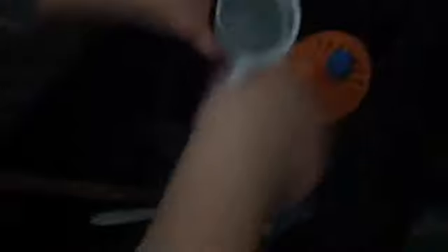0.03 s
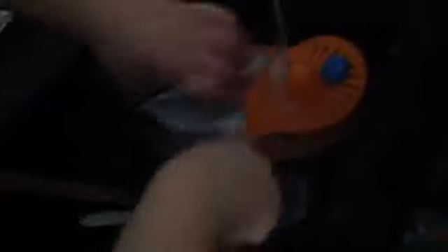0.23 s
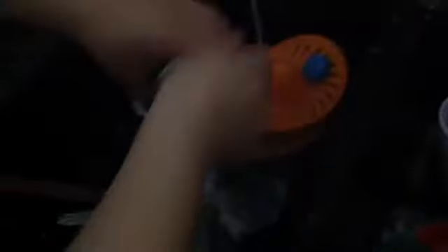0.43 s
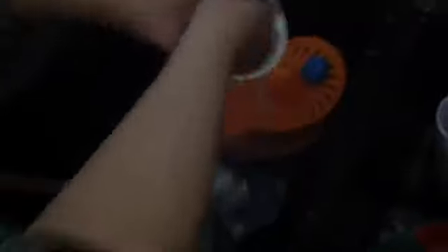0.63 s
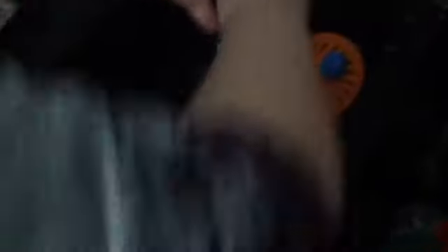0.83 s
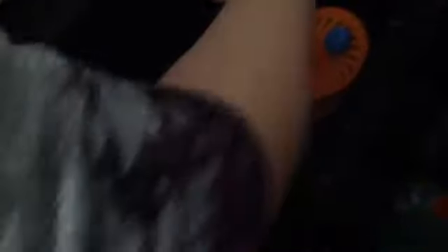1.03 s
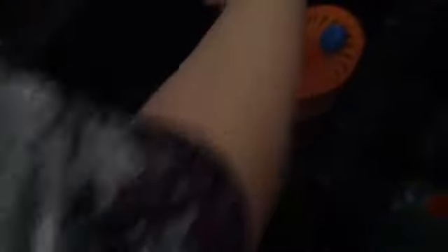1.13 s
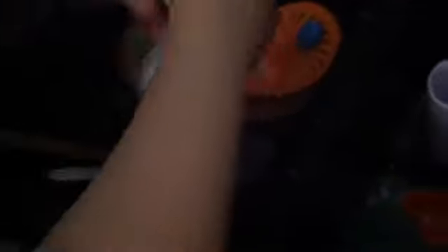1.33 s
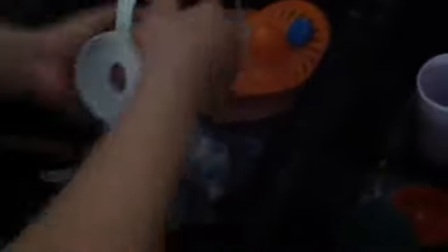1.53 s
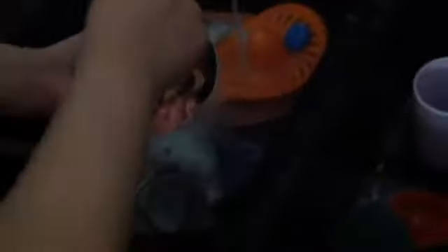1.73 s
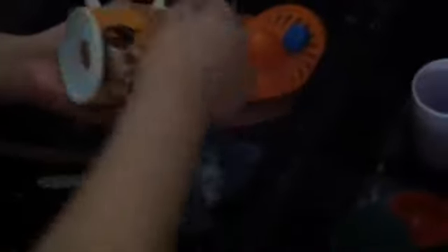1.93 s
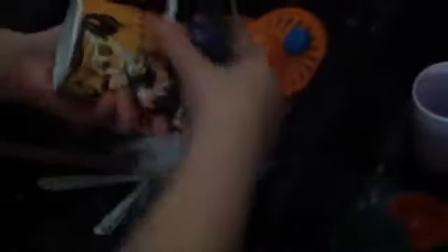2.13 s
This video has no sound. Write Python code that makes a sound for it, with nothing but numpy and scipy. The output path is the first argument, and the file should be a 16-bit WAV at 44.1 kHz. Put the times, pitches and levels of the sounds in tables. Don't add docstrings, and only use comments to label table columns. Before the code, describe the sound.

Crockery clatters sharply in a kitchen sink under a thin tap trickle, then a dull bang echoes.

```python
import sys
import numpy as np
from scipy import signal
from scipy.io import wavfile
from scipy.ndimage import uniform_filter1d

SR = 44100
rng = np.random.default_rng(int(sys.argv[2]) if len(sys.argv) > 2 else 0)


def makeup_ratio(level_db):
    decades = np.asarray(level_db, float) / 20
    return 10 ** decades


def to_wav(s):
    ch = np.atleast_2d(s).T
    pcm = np.round(np.clip(ch, -1, 1) * 32767)
    wavfile.write(sys.argv[1], SR, pcm.astype(np.int16))


N = 97020


def read(points, hz):
    f, value = np.transpose(points)
    return np.interp(np.log(hz + 1), np.log(f + 1), value)


def evened(x):
    return x / np.sqrt(np.mean(x ** 2) + 1e-20)


def add(mix, s, sound):
    part = mix[round(s * SR):][:len(sound)]
    part += sound[:len(part)]


def colour(x, gain_of_hz):
    hz = abs(np.fft.fftfreq(4096, 1 / SR))
    log_gain = np.log(np.maximum(gain_of_hz(hz), 1e-5))
    response = np.fft.ifft(np.exp(np.conj(signal.hilbert(log_gain)))).real[:2048]
    return signal.oaconvolve(x, response)[:len(x)]


def band(hz, centre_hz, octaves):
    return np.exp(-(np.log2((hz + 1) / centre_hz) / octaves) ** 2)


def humps(table, hz):
    return sum(makeup_ratio(2 * db) / (1 + (2 * (hz - f) / w) ** 2) for f, w, db in table)


def tail(decay, seconds):
    gap = 12
    taps = np.zeros(int(seconds * SR) // gap * gap)
    at = np.arange(0, len(taps), gap)
    taps[at + rng.integers(0, gap, len(at))] = rng.choice([-1., 1.], len(at))
    hz, t, z = signal.stft(taps, SR, nperseg=256)
    fade = makeup_ratio(-60 * t / read(decay, hz)[:, None])
    out = signal.istft(z * fade, SR, nperseg=256)[1]
    return out / np.linalg.norm(out)


def struck(modes, focus_hz, contact_s):
    t = np.arange(8000) / SR
    luck = rng.standard_normal((len(modes), 2))
    ring = np.zeros(len(t))
    for (f, db, t60), (a, b) in zip(modes, luck):
        focus_db = 9.5 * np.exp(-(np.log2(f / focus_hz) / 0.15) ** 2)
        pitch = f * (1 + 0.0099 * b)
        ring += makeup_ratio(db + 2.0 * a + focus_db - 60 * t / t60) * np.sin(2 * np.pi * pitch * t)
    ring *= 1 - np.exp(-t / max(contact_s / 3, 1e-4))
    return ring / abs(ring).max()


# f/Hz, level/dB
WATER_TONE = [(24, -60), (40, -25), (266, -4), (407, -9), (1160, -5), (1450, -6.5), (3840, -9.5),
              (14000, -9), (15500, -18.5)]
# f/Hz, width/Hz, level over the wash/dB
HOLLOWS = [(276, 164, 4), (638, 104, 7.5), (985, 47, 6.5), (1459, 106, 10.5), (6530, 140, 1),
           (8250, 94, 9.5), (10600, 86, 9.5), (14350, 240, 10.5)]
# t/s, level/dB
FLOW = [
    [(0.0, -41.5), (0.2, -44.5), (.7, -41)],
    [(1.2, -44), (1.35, -42.5), (1.5, -41.5), (1.67, -42.5), (1.8, -40), (1.92, -42.5), (2.05, -42.5),
     (2.2, -43.5)],
]


def water():
    grains_per_s, spatter_db, water_db = 1500, -8, -42
    grains = makeup_ratio(3 * np.minimum(rng.exponential(1, N), 5)) * (rng.random(N) < grains_per_s / SR)
    spatter = signal.oaconvolve(grains, np.exp(-np.arange(300) / 32.0))[:N] * rng.standard_normal(N)
    wash = rng.standard_normal(N)
    hz, t, z = signal.stft(wash + makeup_ratio(spatter_db) * evened(spatter), SR, nperseg=512)
    patches = uniform_filter1d(rng.standard_normal(z.shape), size=5, axis=0)
    patches = evened(uniform_filter1d(patches, size=8, axis=1))
    s, flow_db = np.transpose(FLOW[0] + FLOW[1])
    flow = np.interp(t, s, flow_db) - flow_db[-3:].mean()
    flow = flow * np.interp(hz, [1500, 4000], [0.5, 1])[:, None]
    x = signal.istft(z * makeup_ratio(1.3 * patches + flow), SR, nperseg=512)[1][:N]
    x = colour(x, lambda f: makeup_ratio(read(WATER_TONE, f)) * np.sqrt(1 + humps(HOLLOWS, f)))
    return makeup_ratio(water_db) * x / np.std(x[N // 2:])


# f/Hz, time to fade by 60 dB/s
KITCHEN = [(150, 1), (500, 0.95), (1500, 1), (4000, 0.68), (15000, 0.51)]


def earlier():
    out = np.zeros(N)
    rumble = colour(tail(KITCHEN, 1.0),
                    lambda f: (f / 200) ** 2 / (1 + (f / 200) ** 2) / (1 + (f / 625) ** 2))
    add(out, 0, makeup_ratio(-42) * rumble / np.std(rumble[:2000]))
    return out


# t/s, peak level/dB, f/Hz, time to
# fade by 60 dB/s
CLINKS = [(.03, -38, 257, 0.51), (0, -46, 3070, 0.53), (0.2243, -18.5, 8700, 0.037),
          (.2590, -14, 14600, 0.035), (.2610, -20.5, 10030, .03), (.2960, -20, 10940, 0.037),
          (.3192, -23, 8330, 0.02), (.3220, -16, 14600, .02), (.4035, -16, 10430, 0.029),
          (0.411, -27, 9400, 0.024), (.4255, -20, 13500, 0.033), (.4250, -22, 9000, 0.019),
          (.6150, -36, 671.7, 0.94), (.6780, -35, 682, 0.25)]


def clinks():
    out = np.zeros(N)
    for s, db, hz, t60 in CLINKS:
        modes = [(hz * k, 0, t60) for k in (.96, 1, 1.03)]
        add(out, s, makeup_ratio(db) * struck(modes, hz, 0.0012))
    return out


# t/s, peak level/dB, centre f/Hz, width/octaves
TICKS = [(0.2, -36.5, 6000, .1), (0.46, -24, 13700, .05), (.517, -20, 13200, .15),
         (0.623, -5.5, 13300, 0.27), (0.6231, -12, 8000, 0.45), (1.235, -25.5, 9450, 0.23),
         (1.244, -23.5, 7400, 0.53), (1.2918, -23, 12000, 0.17), (1.2917, -29, 4500, 0.28),
         (1.3, -23, 4700, 0.8), (1.5032, -18, 12000, 0.55), (1.505, -38, 2900, 0.38),
         (1.679, -35, 11000, 0.2), (1.799, -29, 13000, .35), (1.795, -33.5, 9000, .25),
         (1.407, -35, 9800, .2), (1.436, -35, 12000, .25), (0.73, -31, 9800, .6),
         (1.889, -27.5, 9550, 0.17)]


def ticks():
    out, t = np.zeros(N), np.arange(2500) / SR
    for s, db, hz, octaves in TICKS:
        fade = makeup_ratio(-60 * t / .0045) + makeup_ratio(-16 - 60 * t / .04)
        burst = 6.5 * (t == 0) + rng.standard_normal(len(t)) * fade
        tick = colour(burst, lambda f: band(f, hz, octaves) + 0.012)
        add(out, s, makeup_ratio(db) * tick / abs(tick).max())
    return out


# t/s, peak level/dB, brightest ring f/Hz, crack level/dB, thud level/dB
KNOCKS = [(.2227, -13, 3350, 0, -16), (0.2300, -21.5, 6130, -3, -3), (0.2593, -8, 6130, -6.5, -17.5),
          (0.266, -7.5, 6212, -11.5, -14), (0.285, -15, 3100, -11, -18), (0.2978, -10, 3800, -6.5, -18.5),
          (0.32, -8, 3800, -11, -15), (0.3403, -20.5, 3020, -16, -7), (0.3577, -19, 6130, -12, -1.5),
          (0.3824, -12.5, 3200, -12.5, -15), (.4030, -11.5, 2275, -10, -8),
          (0.4117, -15.5, 2275, -4.5, -26), (0.4251, -14, 3010, -8.5, -7), (0.4484, -18.5, 5000, -6, -16),
          (0.472, -23, 3070, -25, -7)]
# f/Hz, level/dB, time to fade by 60 dB/s
MUG = [(1196, -7.5, 0.035), (2275, -11.5, 0.035), (3010, -3.5, 0.036), (3020, -10.5, 0.033),
       (3200, -1.5, 0.057), (3326, 2.5, 0.02), (3800, -14, 0.024), (3950, -10.5, 0.12), (5000, -17, 0.079),
       (6130, -5, 0.027), (6212, -8, 0.053), (7000, -23, 0.028), (8520, -6.5, 0.032), (10900, -5, 0.036)]
# f/Hz, level/dB
CRACK = [(180, -37), (300, -13), (1620, -5), (3130, -4.5), (4570, -9), (6050, -8.5), (15500, -12.5)]


def knocks():
    rings, noises, t = np.zeros(N), np.zeros(N), np.arange(8000) / SR
    contact_s, thud_hz, thud_t60 = 0.0041, 263, 0.18
    ring_db, thud_all_db = -5, -10
    grip = 0.57 + (1 - 0.57) * np.exp(-(t / 0.0058) ** 2)
    for s, db, hz, crack_db, thud_db in KNOCKS:
        a, b = rng.standard_normal((2, len(t)))
        spots = np.c_[np.arange(13) * 1000 + 3000, np.r_[0, 4.0 * rng.standard_normal(12)]]
        crack = evened(colour(a, lambda f: makeup_ratio(read(CRACK, f) + read(spots, f))))
        crack *= np.exp(-t / (1.94 * contact_s)) * np.minimum(t / 0.00082, 1)
        thud = evened(colour(b, lambda f: 1 / (1 + ((f - thud_hz) / 80) ** 2)))
        thud *= np.minimum(t / 0.016, 1) * makeup_ratio(-60 * t / thud_t60)
        add(rings, s, makeup_ratio(db + ring_db) * struck(MUG, hz, contact_s) * grip)
        add(noises, s, makeup_ratio(db + crack_db) * crack + makeup_ratio(db + thud_db + thud_all_db) * thud)
    return rings, noises


# t/s, peak level/dB, f/Hz, partner f/Hz, held/s
PINGS = [(.2230, -1.5, 3190, 3083, .004), (.2229, -16.5, 1154, 950, 0.0038),
         (.2230, -19.5, 6190, 6050, 0.012), (0.2231, -17, 3940, 5240, .005),
         (.2260, -23.5, 2262, 2204, .014), (.2294, -8.5, 3163, 3050, 0.0053),
         (.2362, -18, 3070, 3170, 0.0031), (.2612, -13.5, 6070, 6270, 0.0032),
         (.2668, -14.5, 6235, 3120, 0.0074), (0.2831, -16, 3080, 3200, .003),
         (.2980, -13, 3730, 3430, .002), (0.319, -15, 8360, 8250, 0.0059), (0.38, -27, 3160, 3180, 0.0089),
         (0.406, -16, 2993, 2275, 0.0044), (0.406, -22, 10600, 10350, 0.0033),
         (0.4253, -24, 2886, 3210, 0.0066)]


def pings():
    out = np.zeros(N)
    rise_s, stop_s, partner = 0.00062, 0.00094, 0.56
    for s, db, hz, partner_hz, held in PINGS:
        t = np.arange(0, held + 8 * stop_s, 1 / SR)
        shape = (1 - np.exp(-t / rise_s)) * np.exp(-np.maximum(t - held, 0) / stop_s)
        tones = np.sin(2 * np.pi * hz * t) + partner * np.sin(2 * np.pi * partner_hz * t)
        add(out, s, makeup_ratio(db) * shape * tones / (1 + partner))
    return out


# t/s, length/s, rms level/dB, centre f/Hz, width/octaves
RUSTLES = [(0.224, 0.0032, -33, 8900, 1), (0.293, .008, -27, 10000, .6), (0.315, .01, -26, 6000, 1.6),
           (0.336, .008, -26, 9000, 1), (0.538, 0.0088, -37, 3970, 1.1), (.595, .012, -38, 11000, .7),
           (1.499, 0.012, -46, 2600, .45), (1.675, .012, -44, 11500, .2), (1.743, 0.032, -46, 4460, 1.2),
           (1.785, 0.026, -41.5, 10500, 0.76), (1.815, .024, -42.5, 1710, 0.74),
           (1.84, 0.033, -45.5, 4430, 1.1)]


def rustles():
    out = np.zeros(N)
    for s, length, db, hz, octaves in RUSTLES:
        t = np.arange(2500) / SR / length
        a, b = rng.standard_normal((2, len(t)))
        grains = a * (.4 + (abs(b) > 2) * 2.5)
        rustle = evened(colour(grains, lambda f: band(f, hz, octaves) + .01))
        shape = np.minimum(4 * t, 1) * np.exp(-np.maximum(t, .25) ** 3)
        add(out, s, makeup_ratio(db) * rustle * shape)
    return out


def rattle():
    from_s, top_s, t60, pings_per_s, level_db = .25, 0.327, 0.61, 3000, -33.5
    out, t, crowd = np.zeros(N), np.arange(400) / SR, SR // 2
    for hz in np.linspace(500, 15200, 60) * rng.uniform(.98, 1.02, 60):
        strength = makeup_ratio(3.0 * np.minimum(rng.exponential(1, crowd), 3))
        hits = strength * (rng.random(crowd) < pings_per_s / 60 / SR)
        ping = makeup_ratio(read(CRACK, hz)) * np.sin(2 * np.pi * hz * t) * np.exp(-t / .001)
        add(out, from_s, signal.oaconvolve(hits, ping))
    clock = np.arange(N) / SR
    rise = np.clip((clock - from_s) / (top_s - from_s), 0, 1)
    return evened(out) * rise * makeup_ratio(level_db - 60 * np.maximum(clock - top_s, 0) / t60)


# t/s, peak level/dB, brightest ring f/Hz
BUMPS = [
    (.263, -14.5, 825),
    (.299, -14, 825),
    (.322, -13, 740),
    (0.391, -6, 2470),
    (0.397, -10, 2230),
    (0.427, -7.5, 706),
    (0.435, -10, 1300),
    (0.541, -16.5, 1880),
    (0.659, -24, 676),
    (1.815, -33.5, 1480),
]
# f/Hz, level/dB, time to fade by 60 dB/s
DISH = [(266, -11.5, 0.053), (641, -0.5, 0.058), (681, 3.5, 0.045), (825, 0.5, 0.07), (1193, -2, 0.13),
        (1302, 4.5, 0.044), (1771, -5, 0.15), (1830, 0.5, 0.085), (2206, -0.5, 0.047)]


def bumps():
    out = np.zeros(N)
    for s, db, hz in BUMPS:
        add(out, s, makeup_ratio(db - 9) * struck(DISH, hz, 0.0036))
    return out


# f/Hz, time to fade by 60 dB/s
HALL = [(150, 1), (500, 0.99), (1500, 0.8), (4000, 0.74), (15000, 0.42)]
# f/Hz, level/dB
BANG = [(47, -52), (80, -56), (189, -14.5), (594, -7), (884, -5.5), (965, -5), (1790, -3.5), (2490, -8.5),
        (15500, -16)]
# f/Hz, width/Hz, level/dB
BANG_RINGS = [(353, 35, 6), (496, 60, 2.5), (880, 99, 6.5), (1048, 24, 8), (1353, 19, 5.5),
              (1814, 310, 1.5), (3120, 190, 2.5)]


def bang():
    bang_s, treble_late_s, build_s = .7655, 0.0079, 0.048
    echo = colour(tail(HALL, 1.4),
                  lambda f: makeup_ratio(read(BANG, f)) * np.sqrt(1 + humps(BANG_RINGS, f) * 2))
    t = np.arange(len(echo)) / SR
    to_go = np.clip(1 - t / build_s, 0, 1)
    low = colour(echo, lambda f: 1 / (1 + (f / 1300) ** 4))
    treble = (echo - low) * np.clip((t - treble_late_s) / 0.0062 + 1, 0, 1) ** 2 * makeup_ratio(-5.5 * to_go)
    heard = low * np.minimum(t / 0.002, 1) + treble
    heard *= makeup_ratio((-1.5 - 60 * build_s) * to_go)
    hz, s, z = signal.stft(heard, SR, nperseg=128)
    clumps = uniform_filter1d(rng.standard_normal(z.shape), size=round(.005 * SR / 64), axis=1)
    clumps = evened(uniform_filter1d(clumps, size=24, axis=0))
    heard = signal.istft(z * makeup_ratio(1.1 * clumps), SR, nperseg=128)[1]
    out = np.zeros(N)
    add(out, bang_s, makeup_ratio(-19.5) * heard / np.std(heard[:4400]))
    return out


def scene():
    knock_rings, knock_noises = knocks()
    rings = knock_rings + bumps() + clinks() + pings()
    noises = knock_noises + rattle()
    echo = np.r_[np.zeros(250), tail(KITCHEN, 1.0)]
    room = signal.fftconvolve(makeup_ratio(-4.5) * rings + noises, echo)[:N]
    mix = rings + noises + makeup_ratio(-4.5) * room
    return (mix + ticks() + rustles() + bang() + earlier() + water())[None]


def band_limit(x):
    return signal.sosfilt(signal.butter(12, 16500, fs=SR, output="sos"), x)


def record(dry):
    def microphone(f):
        bass_cut = 1 / np.sqrt(1 + (89 / (f + 1)) ** 8)
        return bass_cut * makeup_ratio(-42 * np.clip((f - 15200) / 250, 0, 1))

    mic = colour(1.331 * np.tanh(dry[0] / 1.28), microphone)
    return band_limit(mic[None])


dry = scene()
out = record(dry)
to_wav(out)
```